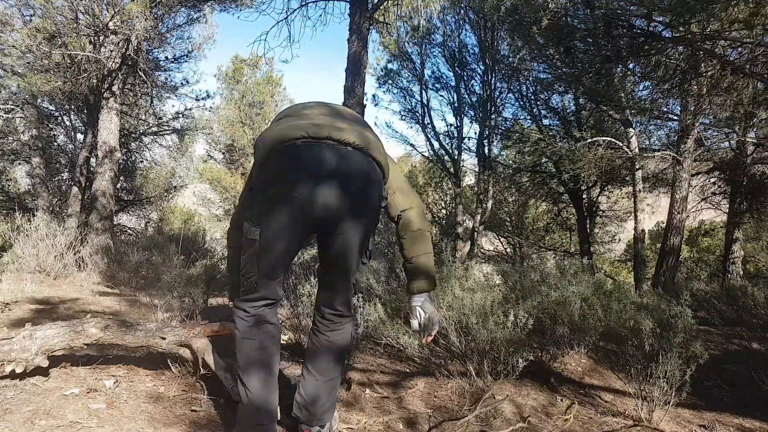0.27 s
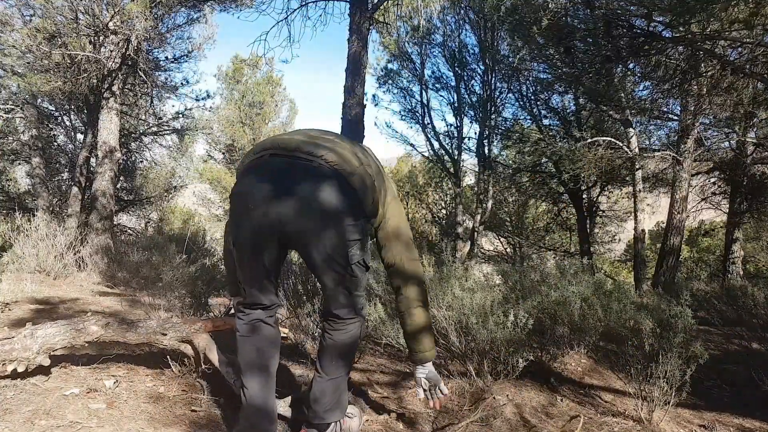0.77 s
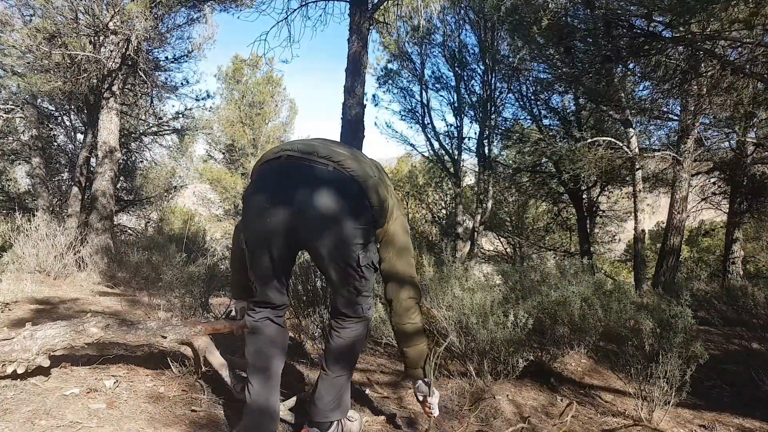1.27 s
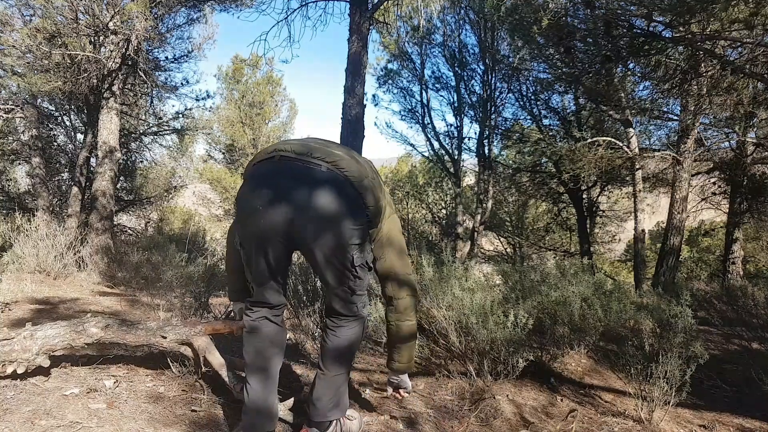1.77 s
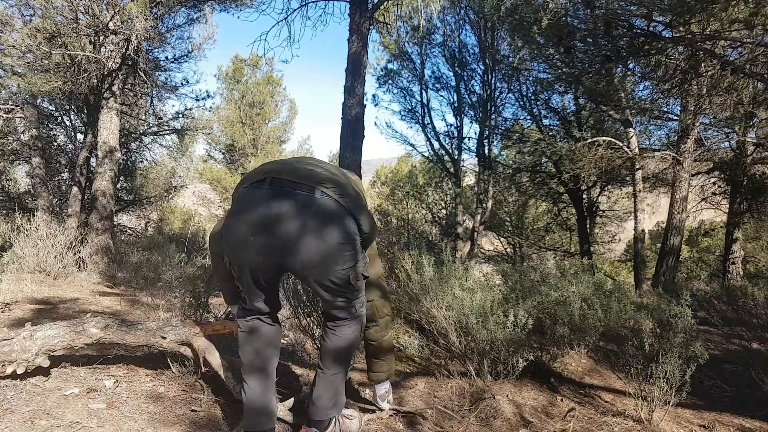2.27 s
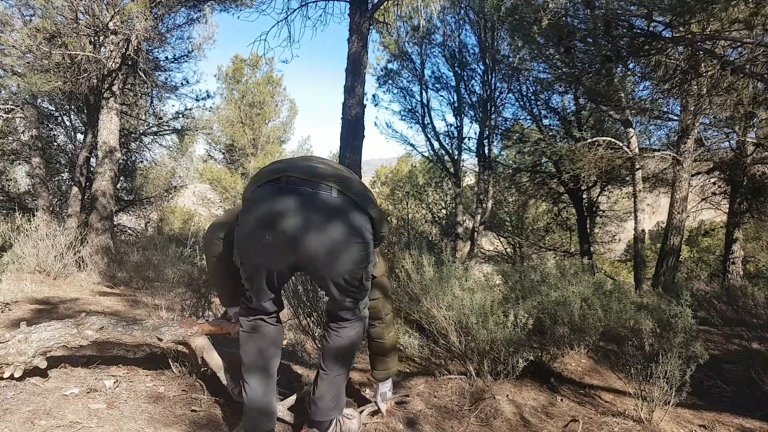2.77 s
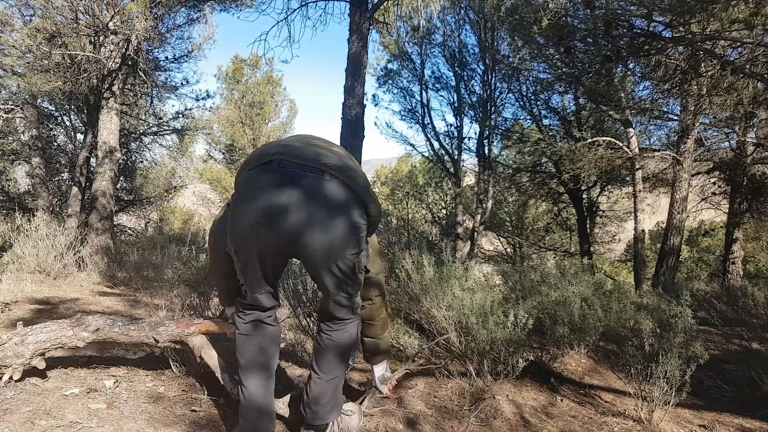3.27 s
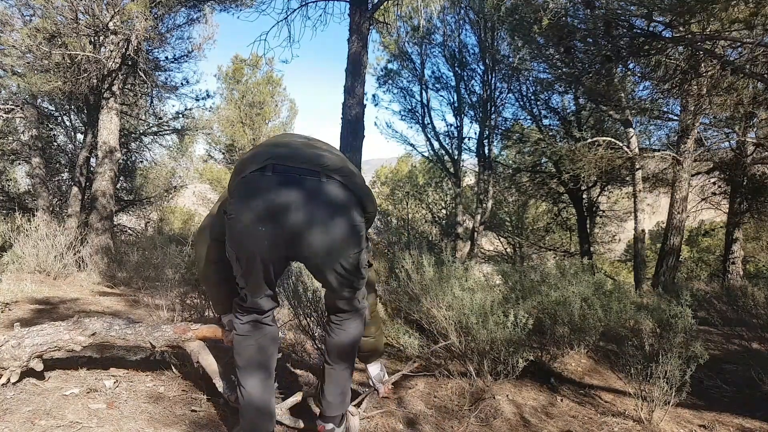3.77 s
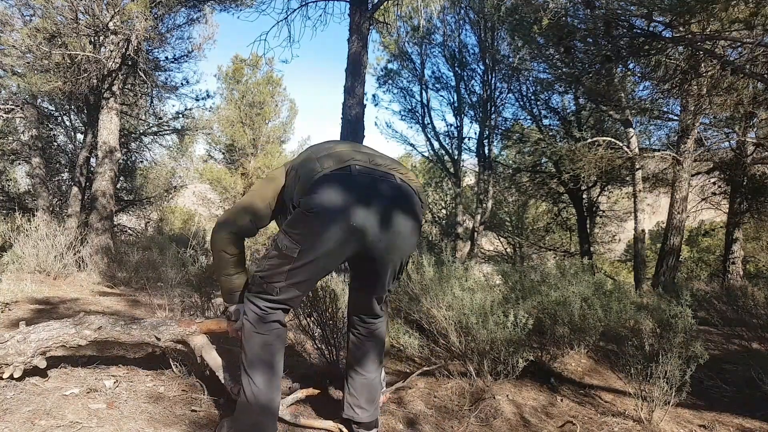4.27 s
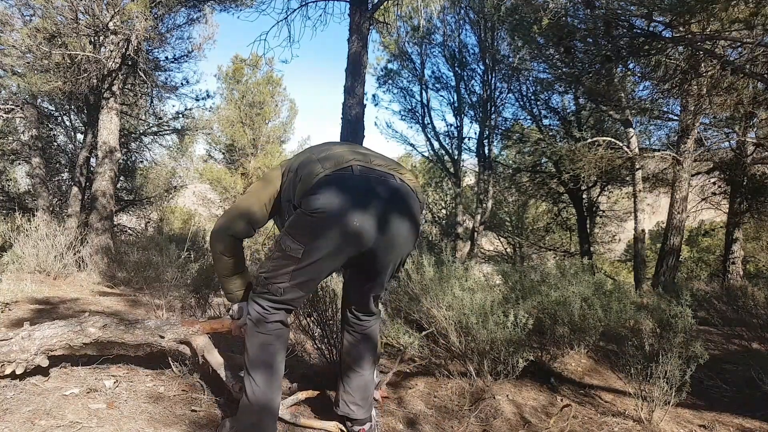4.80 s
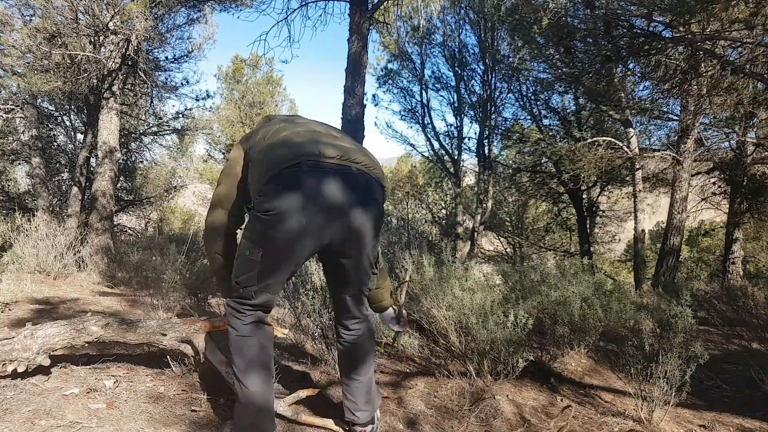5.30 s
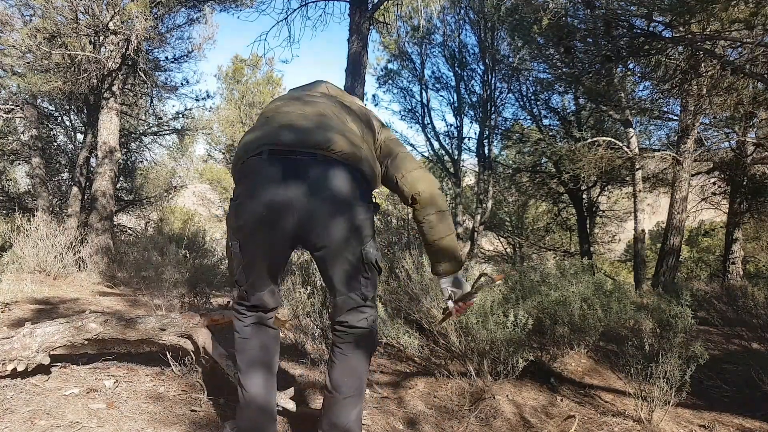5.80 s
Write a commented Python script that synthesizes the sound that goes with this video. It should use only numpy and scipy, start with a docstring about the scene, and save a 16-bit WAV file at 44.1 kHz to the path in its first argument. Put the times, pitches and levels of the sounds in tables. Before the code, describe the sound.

A quiet pine wood heard close in stereo, with faint low air, soft hiss and a very thin, intermittent high camera whine. At about 0.4 s boots lightly crunch litter amid faint twig ticks and rustling; a slight rustle at 1.3 s leads to a dry stick snapping at 1.4 s, bright and abrupt, with a brief scattered echo from the trunks. Small clicks follow until 1.6 s. It is nearly still until a crisp twig click at 2.8 s and a duller knock at 3.15 s. Around 3.9 to 4.2 s several woody knocks mix with boot crunches and rustling. At 5.1 s a thick dead branch cracks, the loudest and fullest sound, with lower knocks trailing to 5.2 s. Soft crunches and rustles continue from 5.4 s, with a last faint tick at 5.9 s. Distant engine tones, barely audible, waver around 2 to 3.4 s and from 3 s onward.

```python
"""A dry stick and then a thick dead branch snap close by in a quiet pine wood, as someone gathers firewood.
Each crack is a burst of tearing fibres through the modes of the wood; the trunks scatter it as small echoes.
Around it twigs click and knock as short damped modes; boots crunch litter and the undergrowth rustles,
both as swelling crackles of tiny grains. Behind lie faint air and hiss as coloured noise, far engines
as single sine lines, and the thin sine whine of the camera."""
import sys
import numpy as np
from scipy import signal
from scipy.fft import rfft, irfft, next_fast_len
from scipy.io import wavfile
from scipy.ndimage import map_coordinates

SR = 44100
rng = np.random.default_rng(int(sys.argv[2]) if len(sys.argv) > 2 else 0)


def master(y):
    """Save y as 16-bit WAV."""
    cut = np.clip(np.atleast_2d(y).T, -1, 1)
    pcm = np.round(cut * 32767)  # scale
    wavfile.write(sys.argv[1], SR, pcm.astype(np.int16))


N = 266672
TIME = np.arange(N) / SR  # s
SINCE_BLOW = np.arange(SR // 3) / SR  # s

# The stick, then the branch. Each row: start in seconds, crack level in dB, splintering against the first
# tear in dB, splintering decay by 60 dB in seconds, echo level in dB.
BREAKS = [(1.4149, -20, -10.5, 0.02, -29.5), (5.0839, -16, -9.5, 0.017, -25.5)]
# Heavily damped modes of the thin stick and the thick branch. Each row: pitch in Hz, width in Hz, gain in dB.
STICK_MODES = [(230, 35, -3), (661, 160, -11.5), (1230, 160, -2), (1560, 240, -2), (2300, 530, 0.5),
               (2850, 330, 3), (3584, 300, -8), (5000, 1200, -8.5), (8250, 730, -12.5), (10800, 1900, -8),
               (14800, 1800, -11)]
BRANCH_MODES = [(210.4, 120, -1.5), (368, 150, -2), (830, 160, 1), (1585, 130, -2), (1900, 190, -2.5),
                (2796, 280, -6), (3547, 320, -5), (5405, 310, -9.5), (7636, 1800, -15), (10950, 3200, -14),
                (14500, 1800, -13.5)]
# Colour of what each sends into the trees. Each row: frequency in Hz, gain in dB.
STICK_ECHO = [(40, -18), (110, -6.5), (230, 0.5), (500, -8.5), (1100, -10), (2000, -3), (2900, -2),
              (4500, -10.5), (7500, -17.5), (11000, -9), (15500, -10)]
BRANCH_ECHO = [(30, -16), (100, -6.5), (220, -4), (500, -5.5), (900, -7.5), (1700, -11), (3500, -12.5),
               (5400, -18), (8000, -22.5), (11000, -17.5), (15500, -20)]
# Echo decay among the trunks. Each row: frequency in Hz, time to fall 60 dB in seconds.
TRUNKS_T60 = [(100, 0.41), (400, 0.21), (2000, 0.26), (6000, 0.26), (15000, 0.2)]
# Likeness of left and right for sounds close to the microphones. Each row: frequency in Hz, likeness (-1 to 1).
NEAR_ALIKE = [(100, 1), (500, 0.43), (1000, 0.9), (1800, 0.29), (3500, 0.51), (15000, -0.16)]

# Twigs clicking and knocking. Each row: start in seconds, knock level in dB, knock pitch in Hz,
# tick level in dB, left over right in dB.
TWIGS = [(.4215, -68, 1200, -62, 3), (.466, -65, 1400, -64.5, 4), (0.8243, -71, 1520, -61, 1),
         (1.4519, -45, 725, -50, -5), (1.504, -50.5, 2490, -49.5, 9), (1.509, -51, 1500, -55, -3),
         (1.5408, -60, 830, -55, -4), (2.411, -68, 1209, -70, 1), (2.678, -83, 757, -69.5, -8),
         (2.805, -43.5, 990, -41, 1.5), (2.933, -61, 995, -59, 2), (3.148, -50.5, 1590, -64.5, -5),
         (3.923, -63, 1140, -60.5, -2), (3.9877, -44, 820, -58.5, 0), (3.992, -52.5, 590, -72, -5),
         (4.023, -58, 560, -63, -2), (4.0324, -53, 397, -71, -6), (5.099, -32, 475, -38, -4),
         (5.106, -36, 917, -49, -6), (5.1578, -44, 776, -62, -5.5), (5.2152, -52.5, 587, -69, -6),
         (5.9073, -74.5, 830, -67.5, 5.5)]
# Bending modes of a twig. Each row: multiple of the knock pitch, width in knock pitches, gain in dB.
TWIG_MODES = [(.3, 0.15, -2), (.76, 0.39, 0.5), (1.65, 0.33, -2), (2.7, 0.68, -11.5), (3.8, 0.7, -17.5)]
# The tick of breaking bark. Each row: pitch in Hz, width in Hz, gain in dB.
BARK_MODES = [(3500, 330, 1.5), (6030, 1100, -1.5), (11000, 4600, -2.5), (15300, 1100, 2.5)]

# Boots crunching the litter. Each row: start in seconds, peak level in dB before the common trim,
# length in seconds (the peak comes after a quarter of it).
STEPS = [(0.381, -49, 0.009), (0.416, -45.5, 0.011), (3.888, -51, 0.011), (4.029, -50, 0.032),
         (4.11, -49.5, 0.012), (4.153, -50, 0.014), (4.17, -52, 0.034), (5.386, -52.5, 0.017),
         (5.628, -50, 0.01), (5.655, -53.5, 0.025), (5.688, -47, 0.012), (5.705, -50.5, 0.016),
         (5.831, -53, 0.012), (5.864, -55, 0.01)]
# Colour of litter under a boot. Each row: frequency in Hz, gain in dB.
BOOT_LITTER = [(60, -8), (160, -4), (400, 4.5), (850, 5), (1600, -5.5), (3000, -14), (6000, -32),
               (15000, -20)]
STEP_TRIM_DB = -7

# Rustles in the undergrowth: strokes of hand and sleeve, the bright tail of a twig's click, bits falling
# into the litter. Each row: loudest moment in seconds, length in seconds, litter level and needle level
# in dB before their trims.
RUSTLES = [(0.444, 0.16, -66.5, -74), (.76, 0.25, -78, -72), (0.88, 0.13, -72.5, -73.5),
           (1.333, 0.048, -60.5, -73), (1.39, 0.099, -65, -78), (1.58, 0.047, -52.5, -63),
           (2.229, 0.027, -80, -65), (2.467, 0.19, -82, -74), (2.686, .12, -90, -69),
           (2.82, 0.024, -73, -57), (3.3, .08, -72.5, -72.5), (3.391, 0.1, -82, -71),
           (3.67, 0.11, -88, -74), (3.844, 0.34, -73, -75), (4.042, 0.047, -67, -58.5),
           (4.143, .06, -74, -71.5), (4.19, 0.17, -65.5, -75.5), (4.4, 0.2, -80.5, -77),
           (5.27, .1, -67, -82), (5.41, 0.12, -78.5, -73), (5.629, .03, -66.5, -71.5),
           (5.686, .08, -69, -79), (5.979, 0.24, -70, -80.5)]
# Colours of rustling litter and of dry needles. Each row: frequency in Hz, gain in dB.
RUSTLE_LITTER = [(200, -12.5), (700, -2.5), (1500, 1.0), (3000, -5.5), (6000, -13.5), (15000, -37.5)]
NEEDLES = [(1500, -19.5), (3500, -3.5), (7500, -9), (11000, 2.5), (15000, 1.5)]
RUSTLE_LITTER_TRIM_DB, NEEDLES_TRIM_DB = -4.5, -0.5
RUSTLE_RISE = 0.55  # share of a rustle spent swelling
RUSTLE_EDGE_DB = 7.5  # how much softer a rustle is at its ends

# A far engine pulls, changes gear and pulls again; a fainter one slows and speeds up.
# Each row: time in seconds, pitch in Hz.
ENGINE = [(2.9, 330.3), (4.0, 359.5), (4.2, 349.8), (4.55, 350), (5.3, 370), (5.8, 366), (6.3, 355)]
FAINT_ENGINE = [(1.85, 458), (2.15, 436), (2.4, 424), (2.95, 499), (3.4, 514)]
ENGINE_DB, FAINT_ENGINE_DB = -76, -81.5  # typical rms
ENGINE_FADE_S = 0.31  # time to come through the trees and to fade again

# Colour of air and hiss. Each row: frequency in Hz, gain in dB.
AIR = [(20, -14.5), (45, -4), (75, 3.5), (105, -5.5), (200, -7), (450, -10.5), (800, -15), (1800, -17),
       (2400, -21), (3800, -23.5), (5200, -29.5), (8200, -35), (12000, -29.5), (15500, -25)]
# Likeness of left and right in the air. Each row: frequency in Hz, likeness (-1 to 1).
AIR_ALIKE = [(30, 0), (75, 0.22), (150, 0.32), (400, 0.14), (1500, 0.035), (15000, 0)]
AIR_DB = -65  # typical rms
# Spells of camera whine. Each row: start in seconds, end in seconds.
WHINE = [(.08, .47), (.63, 1.6), (1.67, 2.53), (2.99, 3.7), (3.84, 4.59), (4.85, 6.3), (5.85, 6.05)]
TOP_HZ = 16000  # band limit of the camera


def amp(db):
    """Decibels to gain."""
    return 10 ** (np.asarray(db) / 20)


def unit(x):
    """Scale to rms 1."""
    return x / np.sqrt(np.mean(x ** 2) + 1e-20)


def blow(x):
    """Scale a short stereo sound to the energy of 5 ms at rms 1."""
    return x * np.sqrt(2 * 0.005 * SR / np.sum(x ** 2))


def along(points, hz):
    """Read (Hz, value) points on a log axis."""
    f, value = np.transpose(points)
    return np.interp(np.log(hz + 1), np.log(f + 1), value)


def filtered(x, response):
    """Multiply the spectrum of x by a response of frequency."""
    n = x.shape[-1]
    padded = 2 * next_fast_len(n // 2 + 1024, True)
    spectrum = rfft(x, padded) * response(np.fft.rfftfreq(padded, 1 / SR))
    return irfft(spectrum, padded)[..., :n]


def causal(colour):
    """The minimum-phase response of a (Hz, dB) colour: it starts at the blow and never before."""
    def response(hz):
        cepstrum = irfft(np.log(amp(along(colour, hz))))
        # fold the half before the blow onto the half after it
        cepstrum[1:len(hz) - 1] *= 2
        cepstrum[len(hz):] = 0
        return np.exp(rfft(cepstrum))
    return response


def ringing(modes):
    """The response of a body as a sum of damped resonances of alternating sign."""
    def response(f):
        total = 0
        for k, (hz, width, db) in enumerate(modes):
            damping = 1j * f * width
            total = total + (-1) ** k * amp(db) * damping / (hz * hz - f * f + damping)
        return total
    return response


def spread(pair, alike):
    """Mix two unrelated signals to left and right with a given likeness at each frequency."""
    def shares(hz):
        likeness = np.clip(along(alike, hz), -1, 1)
        return np.sqrt([1 + likeness, 1 - likeness]) / 2
    mid, side = filtered(pair, shares)
    return np.array([mid + side, mid - side])


def add(track, s, sound):
    """Mix a sound in at time s, cut at the end of the track."""
    start = round(s * SR)
    track[:, start:start + sound.shape[1]] += sound[:, :N - start]


def breaks():
    """The wood gives way within a millisecond or two, splinters, and the trees answer."""
    out = np.zeros((2, N))
    for row, modes, echo_colour in zip(BREAKS, [STICK_MODES, BRANCH_MODES], [STICK_ECHO, BRANCH_ECHO]):
        s, crack_db, splinter_db, splinter_t60, echo_db = row
        tear = fracture(t60=0.0069) + amp(splinter_db) * fracture(splinter_t60)
        add(out, s, amp(crack_db) * blow(filtered(tear, ringing(modes))))
        scattered = trunks(fracture(t60=0.0028), build=0.0077)
        add(out, s, amp(echo_db) * blow(filtered(scattered, causal(echo_colour))))
    return out


def fracture(t60, size=2048):
    """Fibres tearing one after another: a stereo noise burst that swells and dies, even in colour."""
    u = SINCE_BLOW[:size] / t60
    fade = amp(-60 * u) * (1 - np.exp(-u / 0.072))
    burst = rng.standard_normal((2, size)) * fade
    for _ in range(2):
        # flatten the spectrum, then restore the fade
        flat = irfft(np.exp(1j * np.angle(rfft(burst))))
        burst = flat * np.sqrt(fade)
    return blow(spread(burst, NEAR_ALIKE))


def trunks(x, build):
    """Ground, bushes and trunks return a swarm of small echoes that builds up (build in s) and dies."""
    size = len(SINCE_BLOW)
    swarm = spread(rng.standard_normal((2, size)), NEAR_ALIKE)
    hz, t, z = signal.stft(swarm, SR, nperseg=256)
    fall_db = -60 * t / along(TRUNKS_T60, hz)[:, None]
    z = z * (amp(fall_db) + amp(-29 + fall_db / 3))  # far trunks answer faintly and late
    tail = signal.istft(z, SR, nperseg=256)[1][:, :size]
    tail *= 1 - np.exp(-SINCE_BLOW / build)
    tail *= 1 + 0.39 * np.exp(-(SINCE_BLOW / 0.022) ** 2)  # the nearest ground and bushes answer most
    return signal.fftconvolve(x, unit(tail) / np.sqrt(size), axes=1)[:, :size]


def twigs():
    """Each twig gives a heavily damped knock and a crisp tick of breaking bark, echoed by the trunks."""
    out = np.zeros((2, N))
    for s, knock_db, hz, tick_db, pan_db in TWIGS:
        modes = [(hz * multiple, hz * width, db) for multiple, width, db in TWIG_MODES]
        knock = blow(filtered(fracture(t60=0.0046), ringing(modes)))
        tick = blow(filtered(fracture(t60=0.0083), ringing(BARK_MODES)))
        click = amp(knock_db) * knock + amp(tick_db) * tick
        click = click * amp([[pan_db / 2], [-pan_db / 2]])
        add(out, s, click)
        add(out, s, amp(-15) * trunks(click, build=0.004))
    return out


def crackle(colour, rate, spike_db):
    """Stereo grains of rms 1, rate a second: many tiny breaks of very unequal size."""
    hits = rng.random((2, N)) < rate / SR
    spikes = np.minimum(rng.exponential(size=(2, N)), 4)
    sizes = amp(spike_db * spikes) * rng.standard_normal((2, N))
    return unit(filtered(spread(hits * sizes, NEAR_ALIKE), causal(colour)))


def steps():
    """A boot's weight crushes the litter in short swells of crackle."""
    weight = np.zeros((1, N))
    for s, db, length in STEPS:
        u = SINCE_BLOW[None] / (length / 4)
        add(weight, s, amp(db + STEP_TRIM_DB) * u * np.exp(1 - u))
    return weight * crackle(BOOT_LITTER, rate=3900, spike_db=4)


def rustles():
    """Dead litter and fine dry needles rustle: two crackles, coarse and fine, that swell and die together."""
    litter, needles = np.zeros(N), np.zeros(N)
    for s, length, litter_db, needles_db in RUSTLES:
        u = (TIME - s) / (length * np.where(TIME < s, RUSTLE_RISE, 1 - RUSTLE_RISE))
        now = np.abs(u) < 3
        swell = amp(-RUSTLE_EDGE_DB * u[now] ** 2)
        litter[now] += amp(litter_db) * swell
        needles[now] += amp(needles_db) * swell
    coarse = litter * crackle(RUSTLE_LITTER, rate=4600, spike_db=2)
    fine = needles * crackle(NEEDLES, rate=5000, spike_db=5)
    return amp(RUSTLE_LITTER_TRIM_DB) * coarse + amp(NEEDLES_TRIM_DB) * fine


def engine(revs, db):
    """Only one line of a far engine carries through the trees: a sine that follows its pitch."""
    s, hz = np.transpose(revs)
    # tuning and level are each drawn once for the whole pass
    pitch = np.interp(TIME, s, hz) * (1 + 0.0024 * rng.standard_normal())
    level = amp(db + 1.5 * rng.standard_normal())
    inside = np.minimum(TIME - s[0], s[-1] - TIME)
    heard = np.clip(inside / ENGINE_FADE_S + 0.5, 0, 1)
    return heard * level * np.sqrt(2) * np.sin(2 * np.pi * np.cumsum(pitch) / SR)


def air():
    """Faint air in the crowns and the microphones' own hiss, as one steady coloured noise."""
    noise = spread(rng.standard_normal((2, N)), AIR_ALIKE)
    noise = filtered(noise, lambda hz: amp(along(AIR, hz)))
    return amp(AIR_DB + 0.22 * rng.standard_normal()) * unit(noise)


def whine():
    """A thin camera whine comes and goes, a sine sagging a little in pitch each time."""
    out = np.zeros((2, N))
    for start, end in WHINE:
        t = TIME[TIME < end - start]
        pitch = 14750 + 230 * np.exp(-t / 0.25) + 30 * rng.standard_normal()  # Hz
        left_right = amp([[-77], [-81]])
        add(out, start, left_right * np.sin(2 * np.pi * np.cumsum(pitch) / SR))
    return out


def scene():
    """All that sounds among the pines, near and far, with the camera's whine."""
    engines = engine(ENGINE, ENGINE_DB) + engine(FAINT_ENGINE, FAINT_ENGINE_DB)
    return breaks() + twigs() + steps() + rustles() + engines + air() + whine()


def record(dry):
    """The camera thins the deepest bass and keeps nothing above its band limit."""
    def response(hz):
        low_cut = 1j * hz / (22 + 1j * hz)
        band_limit = np.clip((TOP_HZ - hz) / 400 + 0.5, 0, 1)
        return low_cut * band_limit
    return filtered(dry, response)


dry = scene()
out = record(dry)
master(out)
```